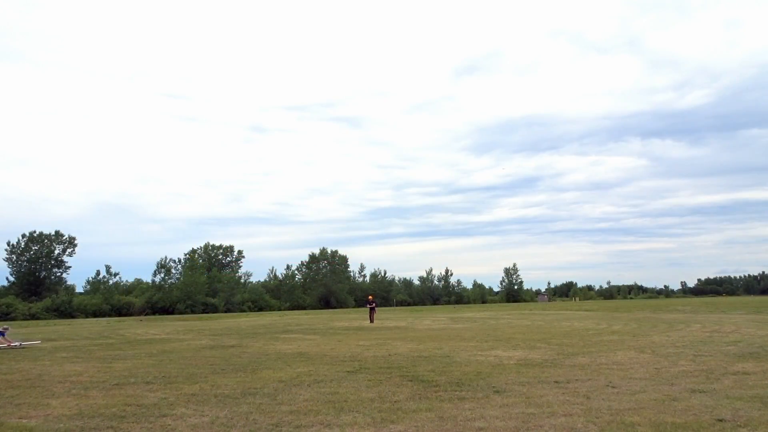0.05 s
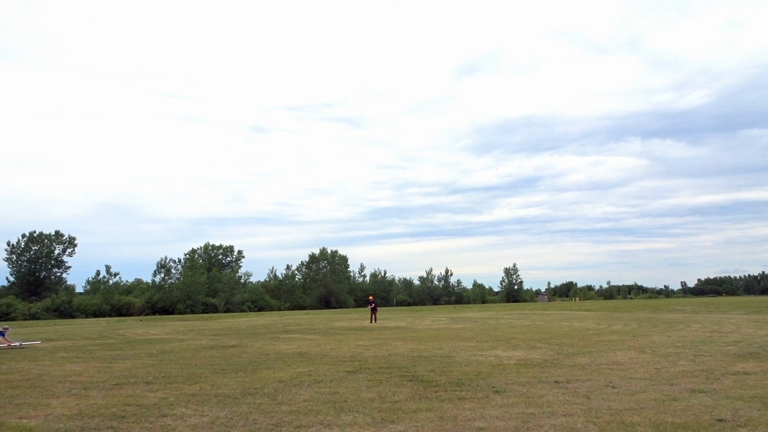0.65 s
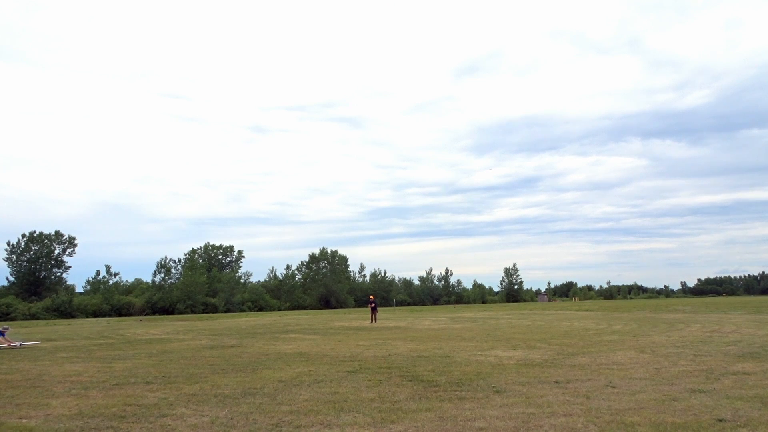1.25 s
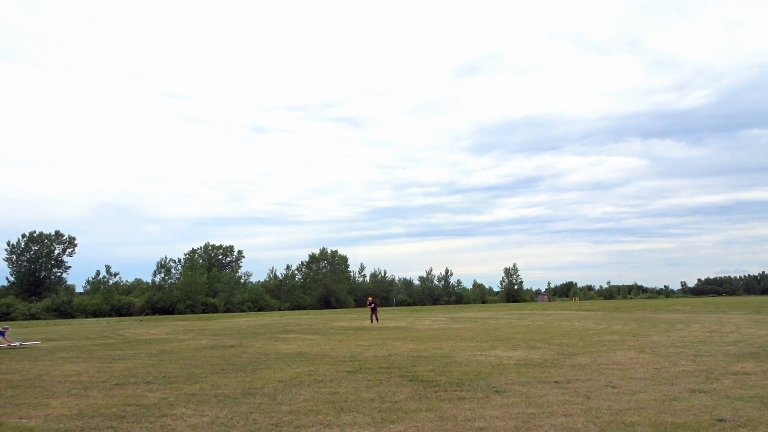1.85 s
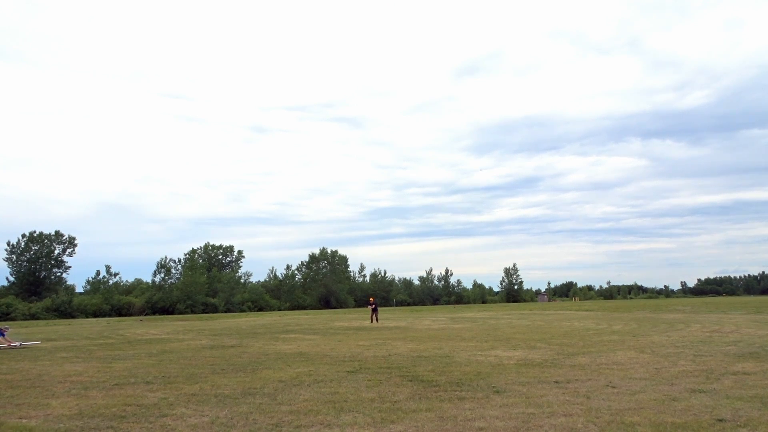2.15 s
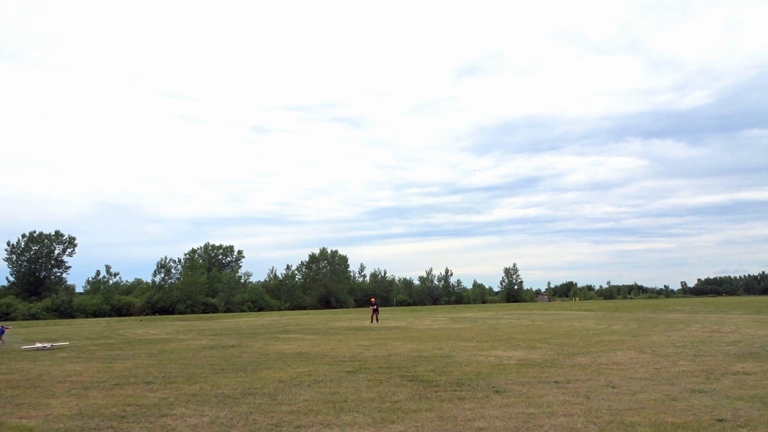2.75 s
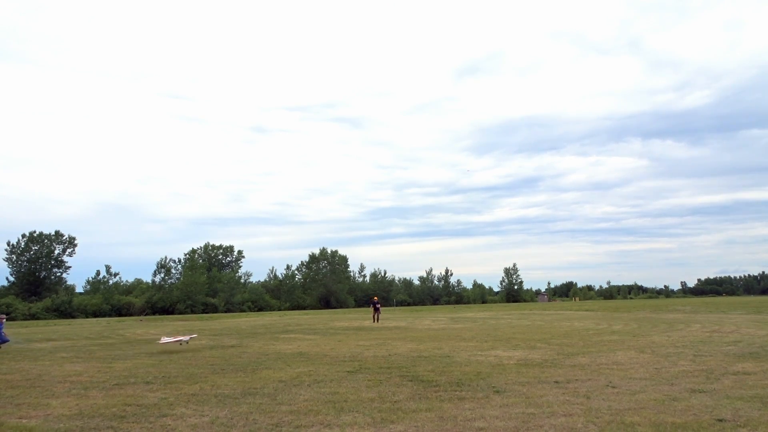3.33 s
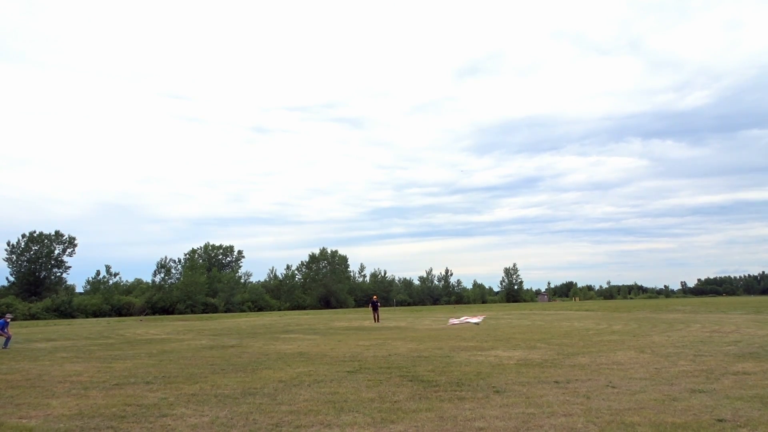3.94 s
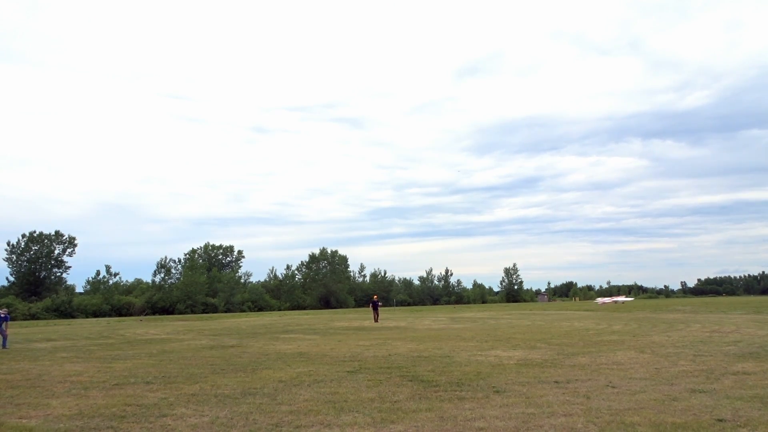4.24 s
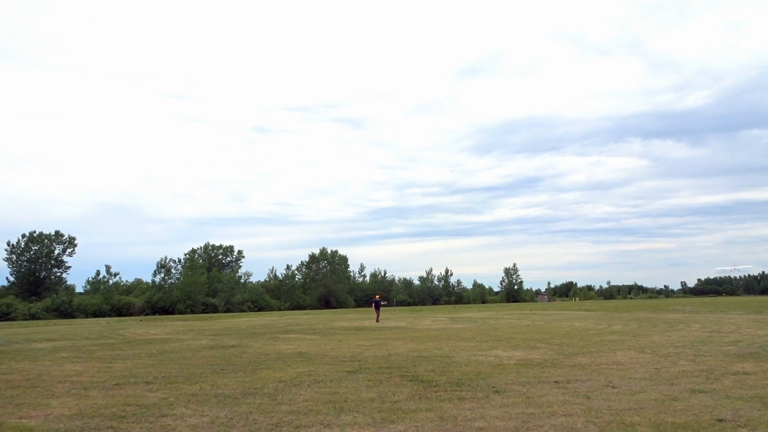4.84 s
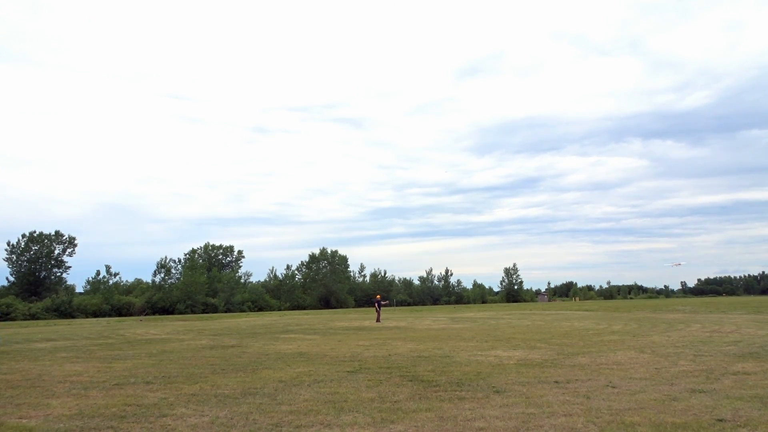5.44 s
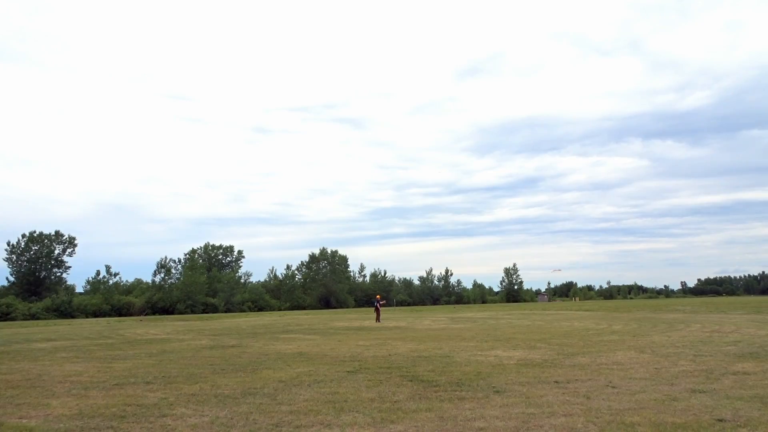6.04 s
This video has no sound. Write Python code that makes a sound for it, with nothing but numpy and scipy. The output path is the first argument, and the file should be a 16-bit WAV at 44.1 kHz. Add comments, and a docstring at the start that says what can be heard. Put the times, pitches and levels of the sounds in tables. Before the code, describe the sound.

High, steady buzz of a small model plane engine, swelling as it sweeps past left to right and fading with slight stumbles.

```python
"""First comes the buzz of a model airplane's two-stroke glow engine, standing at full throttle on grass.
The plane rolls off on a circle, passes close from left to right and climbs away. Exhaust pulses and
propeller blades sound harmonics of the shaft speed; the level follows the distance, the timbre the side
that faces the microphone. Now and then the engine stumbles, loses speed and picks up again.
Two far engines drone under a light breeze."""
import sys
import numpy as np
from scipy import signal
from scipy.fft import rfft, irfft, next_fast_len
from scipy.io import wavfile
from scipy.ndimage import uniform_filter1d, map_coordinates

SR = 44100
rng = np.random.default_rng(int(sys.argv[2]) if len(sys.argv) > 2 else 0)


def to_wav(sig):
    """Store sig (one row per channel, or 1-D mono) as 16-bit WAV at the path in sys.argv[1].

    Samples outside -1..1 are clipped; the rate is SR.
    """
    pcm = np.clip(np.atleast_2d(sig), -1, 1) * 32767
    pcm = np.round(pcm).astype(np.int16)
    wavfile.write(sys.argv[1], SR, pcm.T)  # frames by channels


N = 272844

# engine stumbles: t/s, shaft speed lost/Hz, rise in uneven firing/dB
STUMBLES = [(1.49, 1.6, 3.5), (1.958, 1.5, 4.5), (2.424, 2.31, 9), (2.605, 3.05, 6.5), (2.666, 3.6, 6),
            (2.82, 2.3, 5), (3.108, 2.39, 3.5), (3.178, 5.3, 6), (3.517, 3.7, 9.5), (4.385, 4.2, 6),
            (4.69, 2.26, 3.5), (5.227, 0.99, 4.5), (5.345, 0.96, 6.5), (6.038, 1.9, 5)]
PULL_UP_S = 4.35  # the climb begins


def airplane(tone_db=-1.97, sag=0.35):
    """Periodic sources: one firing and two blade passes a turn give tones, which sag in a stumble."""
    # side in view: t/s, index (0 standing, 1 nose, 2 front quarter, 3 wingtip, 4 flank,
    # 5 rear quarter, 6 tail, 7 dead astern, 8 aloft)
    aspect = [(2.1, 0), (2.75, 0.5), (3.16, 1.5), (3.2, 2.5), (3.33, 2), (3.53, 3), (3.6, 3), (3.72, 4),
              (3.82, 4), (3.99, 5), (4.2, 5), (4.5, 6), (4.65, 6), (4.85, 7), (5.25, 7), (5.7, 8)]
    # a row per side, at the nearest distance: exhaust/dB, its uneven firing/dB, whine/dB, hiss/dB
    side_levels = [(-19, -12, -24.5, -23.5), (-21, -6, -30.5, -25), (-21.5, -9.5, -22, -24),
                   (-19.5, -18, -28, -25), (-19.5, -20, -27.5, -30.5), (-19, -13.5, -27.5, -27),
                   (-20.5, -8.5, -28, -28.5), (-23, -7.5, -25, -28), (-20, -6.5, -28.5, -30)]
    # the once-a-turn tone and the twice-a-turn propeller tone: t/s, level/dB
    throb_levels = [(0.13, -37.5), (2.67, -36), (2.82, -41), (4.75, -30.5), (6.15, -32.5)]
    blade_levels = [(0.05, -23), (2.31, -23), (2.39, -26.5), (2.9, -23), (3.15, -25.5), (3.2, -29),
                    (3.58, -36), (3.76, -22.5), (4.02, -21), (5.45, -56), (6.15, -51)]
    turns = np.cumsum(shaft_speed() * (1 + 0.001313 * wobble(30))) / SR
    firings = np.interp(np.arange(1, int(turns[-1])), turns, np.arange(N))
    view, throb_db, blade_db = curves(aspect) + curves(throb_levels) + curves(blade_levels)
    exhaust_db, uneven_db, whine_db, hiss_db = np.transpose(side_levels) @ facing(view, count=9)
    stumble_db = stumbling()
    sag_db = sag * stumble_db
    throb = amp(throb_db + 0.98 * wobble(16)) * np.sin(2 * np.pi * turns)
    blades = amp(blade_db - sag_db + 0.83 * wobble(22.96)) * np.sin(4 * np.pi * turns)
    tones = amp(tone_db - sag_db) * exhaust_tones(turns, view)
    exhaust = amp(exhaust_db) * (tones + amp(uneven_db + stumble_db) * burble(firings, view))
    side = np.interp(view, [0, 1, 2, 3, 5, 6], [0, 1, 1, 2, 2.2, 3])  # standing, nose, flank, tail
    surge_db = 4.5 * bell(3.17, width_s=.1)  # the exhaust outlet swings past the microphone
    shadow_db = 13 * bell(4.99, width_s=.13)  # from astern the fuselage hides the treble
    overtones = amp(whine_db - sag_db) * whine(turns, side)
    rush = amp(hiss_db + surge_db + 0.58 * wobble(12)) * hiss(turns, side)
    treble = amp(-shadow_db) * (overtones + rush)
    return np.sqrt(2) * (throb + blades) + nearness() * (exhaust + treble) + cracks() + whistle()


def shaft_speed(falter_s=.011, recover_s=.09, hunt_hz=8.3, hunt_depth_hz=.45):
    """Shaft speed sets the fundamental: it drops in a stumble, recovers slowly and hunts in the climb."""
    # the engine unloads as the plane gathers speed: t/s, f/Hz as heard
    shaft = [(0.0, 175.9), (0.83, 175.8), (1.25, 175.2), (2.44, 175.5), (3.06, 182.4), (3.42, 183.4),
             (3.84, 184.9), (4.27, 181.4), (5.07, 181.3), (5.65, 183.7), (6.19, 189.0)]
    hz, = curves(shaft)
    t = np.arange(N) / SR
    hz += hunt_depth_hz * (t > PULL_UP_S) * np.sin(2 * np.pi * hunt_hz * t + wobble(2))
    for s, lost_hz, _ in STUMBLES:
        falter = (1 + np.tanh((t - s) / falter_s)) / 2
        hz -= lost_hz * falter * np.exp(-np.maximum(t - s, 0) / recover_s)
    return hz


def stumbling():
    """Aperiodicity: uneven firing rises, in dB, at each stumble and for longer as the plane pulls up."""
    brief_db = sum(db * bell(s, width_s=0.019) for s, _, db in STUMBLES)
    return brief_db + 4.5 * bell(PULL_UP_S, width_s=0.091)


def exhaust_tones(turns, view, smear_rad=1.23, flutter_db=1.5):
    """Directivity: the exhaust radiates a different harmonic spectrum to each side."""
    # relative level/dB of shaft orders 3 to 15
    standing = [-1, -1.5, -18.5, -2, -11, -6.0, -19.5, -1.5, -4, -4.5, -9.5, -21.5, -11.5]
    nose = [-1, 2, -10.5, -7.5, -5, -21, -7.5, -7.5, -4.5, -19, -16, -14, -18]
    quarter = [0, -12, -8.5, -19, -8.5, -21, -19, -13, -1.5, -15, -19, -26, -8]
    wingtip = [1, -17, -12, -12, -22, -14, -2, -17, -14, -6, -10, -13, -14]
    flank = [-9.5, -14.5, -20, -2.5, -17, -13.5, -10, 0.0, -4, -11, -11, -11, -11]
    rear = [-10.5, -25, -14, -4, -11.5, -9, 1, -9, -13, -19, -14.5, -18, -27]
    tail = [-17, -8, -4.5, -2.5, 1, -8, -14, -15, -12, -0.5, -16, -3, -46]
    astern = [-9, -14, -10.5, -15, 0.5, -19, -22, -9, -4, -3.5, -14, -14, -38]
    aloft = [-10, -6, 1, -9.5, -10, -8.5, -13, -7, -5.5, -6, -10, -12.5, -26]
    spectra = np.transpose([standing, nose, quarter, wingtip, flank, rear, tail, astern, aloft])
    gains = amp(spectra @ facing(view, count=9))
    gains /= np.sqrt(np.sum(gains ** 2, axis=0) / 2)
    orders = 3 + np.arange(len(gains))
    waver_db = 1 + .4 * np.clip(view, 0, 1)  # deeper once the plane moves
    phases = smear_rad * rng.standard_normal(len(orders))
    return sum(g * amp(waver_db * wobble(5.018) + flutter_db * wobble(45))
               * np.sin(2 * np.pi * k * turns + p) for k, g, p in zip(orders, gains, phases))


def burble(firings, view, slip_chance=.06, low_hz=260, high_hz=2300):
    """Forced resonance: unequal firings and swirling gas ring the muffler between the harmonics."""
    # muffler resonances from ahead and from behind: f/Hz, bandwidth/Hz, level/dB
    modes_ahead = [(370, 104, 0.5), (636, 510, -7.5), (1315, 250, -3.5), (2050, 290, -12)]
    modes_behind = [(1061, 286, 2), (1205, 325, 3.5), (1470, 510, -1.5), (2430, 820, -10.5)]
    behind = np.clip(view - 4, 0, 1)
    # a share of the unevenness is a strong-weak alternation that slips now and then
    share = np.interp(behind[firings.astype(int)], [0, 1], [0.18, 0.56])
    alternation = np.cumprod(np.where(rng.random(len(firings)) < slip_chance, 1, -1))
    scatter = unit(rng.uniform(-1, 1, len(firings)))
    puffs = unit(pulses(firings, np.sqrt(share) * alternation + np.sqrt(1 - share) * scatter))
    swirl = unit(rng.standard_normal(N) + 1.1 * rng.standard_normal((2, N)))
    gas = filtered(puffs + swirl, lambda f: (1j * f / (1j * f + low_hz) / (1 + 1j * f / high_hz)) ** 2)
    forward = np.sqrt(1 - behind) * unit(resonate(gas, modes_ahead))
    return forward + np.sqrt(behind) * unit(resonate(gas, modes_behind))


def whine(turns, side, lobe_db=8.0, flutter_db=2):
    """Beaming: each high exhaust overtone has narrow beams, so they ring out singly as the plane turns."""
    # standing plane: relative level/dB of shaft orders 16 to 36
    standing_db = [-19, -5, -6, -10.5, -6, -9, -19, -16, -12.5, -17, -13.5, -10.5, -8, -8, 0, -3, -13, -5.5,
                   -6, -16, -7]
    # spectral lobes of the moving plane: f/Hz, level/dB at nose, flank, tail
    lobes = [(2960, -16, -11, -8.5), (3300, 1, 3.5, 4.5), (3570, 4, -4.5, -4.5), (4020, -17, -8.5, -21),
             (4300, -19, -7, -11), (4943, -3, -1.5, 4), (5260, 1.5, -2, -4), (5700, -5, -6, -13),
             (6180, -11, -3.5, -11), (7030, -22, -18, -22)]
    # the lobes slide upward in the climb: t/s, frequency ratio
    slide = [(5.65, 1.04), (5.92, 1.1), (6.15, 1.17)]
    orders = np.arange(16, 45)
    step = 64  # samples between gain updates
    s = np.arange(0, N, step) / SR
    order_hz = orders[:, None] * np.gradient(turns)[::step] * SR
    log_hz = np.log(order_hz / np.interp(s, *np.transpose(slide)))
    hz, *sides_db = np.transpose(lobes)
    beams_db = lobe_db * np.tanh([wobble(3.425, step) for _ in orders])
    standing = np.pad(standing_db, (0, len(orders) - len(standing_db)), constant_values=min(standing_db))
    moving = [np.interp(log_hz, np.log(hz), db) + beams_db for db in sides_db]
    shapes = amp([np.tile(standing[:, None], len(s))] + moving)
    shapes /= np.linalg.norm(shapes, axis=1, keepdims=True)
    gains = np.sum(shapes * facing(side[::step], count=4)[:, None], axis=0)
    gains *= np.sqrt(2) / np.linalg.norm(gains, axis=0)
    sound = np.zeros(N)
    for k, gain in zip(orders, gains):
        flutter = amp(flutter_db * (wobble(60, step) + wobble(7, step)) / np.sqrt(2))
        envelope = np.interp(np.arange(N) / SR, s, gain * flutter)
        sound += envelope * np.sin(2 * np.pi * (k * turns + rng.random()))
    return sound


def hiss(turns, side, apart=0.54, pulsing=0.54, low_hz=2100, patchy_db=2.6):
    """Flow noise: gas and blade hiss pulses twice a turn; moving air makes it flutter."""
    # spectrum by side: f/Hz, level/dB standing and at nose, flank, tail
    spectra = [(2470, -7.5, -3.5, -0.5, -3), (3500, -3.5, -1.5, -0.5, 0), (5060, -1, 2.5, -3, 0),
               (6340, 0, -7.5, -6, -3), (9340, 1, -8, -8.5, -10.5), (10840, -23, -11, -12, -18.5)]
    common, left, right = rng.standard_normal((3, N))
    jet = unit((1 + pulsing * np.cos(4 * np.pi * turns)) * (common + apart * np.array([left, right])))
    hz, s, frames = signal.stft(jet, SR, nperseg=512)
    f, *colours = np.transpose(spectra)
    high_pass = hz ** 4 / (hz ** 4 + low_hz ** 4)
    shapes = np.transpose([unit(high_pass * spectrum(hz, f, db)) for db in colours])
    gain = shapes @ facing(side[np.minimum(s * SR, N - 1).astype(int)], count=4)
    patches = uniform_filter1d(rng.standard_normal(gain.shape), size=4, axis=0)
    patches = unit(uniform_filter1d(patches, size=18, axis=1))
    return signal.istft(frames * gain * amp(patchy_db * patches), SR, nperseg=512)[1][:, :N]


def cracks():
    """Impulse response: a few late, hard firings snap out of the exhaust as damped sinusoids."""
    # hard firings: t/s, peak level/dB
    firings = [(3.098, -7.5), (3.143, -10.5), (3.153, -7), (3.164, -8), (3.175, -9.5), (3.21, -10),
               (3.249, -10.5), (3.26, -10.5), (5.224, -20), (5.344, -19)]
    # their ring: f/Hz, t60/s, level/dB
    modes = [(3650, .006, 7), (4450, .005, 4), (5150, .003, -3)]
    s, db = np.transpose(firings)
    t = np.arange(SR // 200) / SR
    snap = sum(amp(level - 60 * t / t60) * np.sin(2 * np.pi * hz * t) for hz, t60, level in modes)
    return signal.fftconvolve(pulses(s * SR, amp(db)), snap / np.abs(snap).max())[:N]


def whistle(hz=8780, width_hz=180):
    """Narrow-band noise is heard as a pitch: a thin whistle swells and flickers during the roll."""
    # swells: t/s, width/s, level/dB
    swells = [(2.8, 0.21, -40), (3.2, 0.052, -35), (3.52, 0.095, -32.5)]
    level = sum(amp(db) * bell(s, width_s) for s, width_s, db in swells)
    band = filtered(rng.standard_normal(N), lambda f: np.exp(-((f - hz) / width_hz) ** 2))
    return level * amp(3.73 * wobble(20)) * unit(band)


def nearness(roll_s=2.4, pass_s=3.783, lap_s=6.18, closest_m=10.33, radius_m=13.56):
    """Spherical spreading: gain falls as 1 over distance along the circle, from 1 at the closest point."""
    angle = 2 * np.pi * (np.maximum(np.arange(N) / SR, roll_s) - pass_s) / lap_s
    return closest_m / np.abs(closest_m + radius_m - radius_m * np.exp(1j * angle))


def ports(x, shade_hz=550):
    """Time and level differences: the nearer microphone port hears sooner and, above the bass, louder."""
    # bearing of the plane: t/s, level left over right/dB, lead of the left port/ms
    bearing = [(0, 5.5, 0.061), (3.4, 4.5, 0.039), (3.8, -1, -0.0026), (4.2, -5.5, -0.033),
               (4.7, -5.5, -0.062), (6.19, -4.5, -0.032)]
    pan_db, lead_ms = curves(bearing)
    bass = filtered(x, lambda hz: 1 / (1 + (hz / shade_hz) ** 2))
    shift = lead_ms * SR / 1000 / 2
    shaded = bass + (x - bass) * amp(np.array([pan_db, -pan_db]) / 2)
    return np.array([map_coordinates(port, [np.arange(N) + side * shift], mode="nearest")
                     for port, side in zip(shaded, (1, -1))])


def field_echo(x, echo_db=-16, t60=1.0, dull_hz=6000):
    """Scattering: grass and far trees return a faint, dull answer."""
    t = np.arange(SR // 2) / SR
    tail = rng.standard_normal((2, len(t))) * amp(-60 * t / t60)
    wet = signal.fftconvolve(x, tail / np.linalg.norm(tail[0]), axes=1)[:, :N]
    return amp(echo_db) * filtered(wet, lambda hz: hz / (hz + 400) / np.hypot(1, hz / dull_hz))


def far_engines():
    """Attenuation with distance: of two far engines only the firing tones and their octaves carry."""
    # firing tones: t/s, f/Hz, level/dB
    steady = [(0, 79.2, -39.5), (3, 78.8, -40.5), (6.19, 78.4, -42.5)]
    rising = [(0, 82.4, -54), (2.2, 83, -46), (3.5, 83.4, -40), (5, 84.2, -47), (6.19, 83.4, -41)]
    drone = np.zeros(N)
    for rows, octave_db in ((steady, -5.5), (rising, -9)):
        hz, db = curves(rows)
        phase = 2 * np.pi * np.cumsum(hz + 0.17 * wobble(4.62)) / SR
        tone = np.sin(phase) + amp(octave_db) * np.sin(2 * phase)
        drone += np.sqrt(2) * amp(db + 1.9 * wobble(3.66)) * tone
    return drone


def breeze(level_db=-46, side_db=-15):
    """Wind noise: a low rumble, nearly coherent at both ports, eases off as the gust passes."""
    # rumble: f/Hz, relative spectral level/dB
    rumble = [(15, -53), (30, -5.5), (58, -8.5), (110, -5.5), (250, -9), (700, -15.5), (2000, -76),
              (6000, -91)]
    gust_db = np.linspace(1.5, -3, N) + 1.2 * wobble(2.5)
    mid, side = unit(filtered(rng.standard_normal((2, N)), lambda hz: spectrum(hz, *np.transpose(rumble))))
    return amp(level_db + gust_db) * (mid + amp(side_db) * np.array([side, -side]))


def amp(db):
    """Decibels to amplitude ratio."""
    return 10 ** (np.asarray(db) / 20)


def unit(x):
    """Normalisation to rms 1."""
    return x / np.sqrt(np.mean(x ** 2) + 1e-20)


def curves(rows):
    """Linear interpolation: one value per sample for each column after the time."""
    s, *cols = np.transpose(rows)
    return [np.interp(np.arange(N) / SR, s, c) for c in cols]


def bell(s, width_s):
    """Gaussian envelope of height 1 around a moment."""
    return np.exp(-((np.arange(N) / SR - s) / width_s) ** 2 / 2)


def wobble(rate, step=1):
    """Smooth random modulation, rate knots a second, read at every step-th sample."""
    return map_coordinates(rng.standard_normal(int(N * rate / SR) + 4), [np.arange(0, N, step) * rate / SR])


def facing(view, count):
    """Linear crossfade: weights of the sides, each fading into its neighbours."""
    return np.maximum(1 - abs(np.clip(view, 0, count - 1) - np.arange(count)[:, None]), 0)


def spectrum(hz, f, db):
    """Spectral envelope: gain at hz, interpolated in dB over log frequency."""
    return amp(np.interp(np.log(hz + 1), np.log(f), db))


def filtered(x, response):
    """Linear filtering: the spectrum of x times a complex frequency response."""
    m = next_fast_len(N + SR // 4)
    return irfft(rfft(x, m) * response(np.fft.rfftfreq(m, 1 / SR)), m)[..., :N]


def resonate(x, modes):
    """Modal superposition: x through parallel resonances of alternating sign."""
    return filtered(x, lambda f: sum((-1) ** k * amp(db) * 1j * f * width / (hz**2 - f**2 + 1j * f * width)
                                     for k, (hz, width, db) in enumerate(modes)))


def pulses(at, sizes):
    """Band-limited impulses: windowed sincs at fractional sample positions."""
    taps = np.floor(at)[:, None] + np.arange(-7, 9)
    offset = taps - at[:, None]
    shape = np.sinc(offset) * np.cos(np.pi * offset / 16) ** 2
    return np.bincount(np.clip(taps, 0, N).astype(int).ravel(), (sizes[:, None] * shape).ravel(), N + 1)[:N]


def scene():
    """Superposition: the plane, its echo and the background of the open field."""
    plane = airplane()
    return ports(plane) + field_echo(plane) + far_engines() + breeze()


def record(dry, top_hz=11050):
    """Band limiting: nothing above top_hz is kept."""
    return filtered(dry, lambda hz: hz < top_hz)


dry = scene()
out = record(dry)
to_wav(out)
```